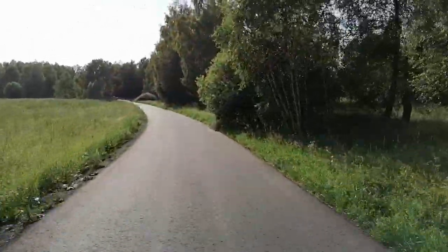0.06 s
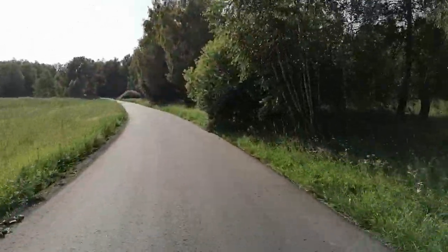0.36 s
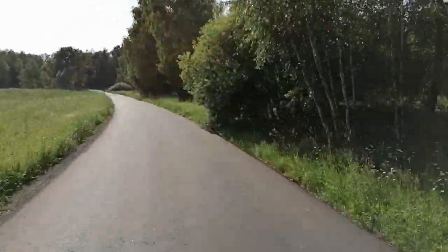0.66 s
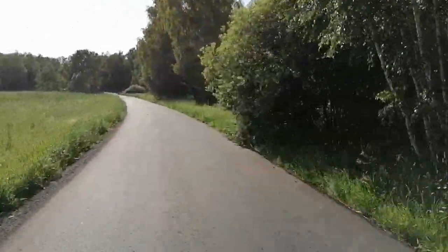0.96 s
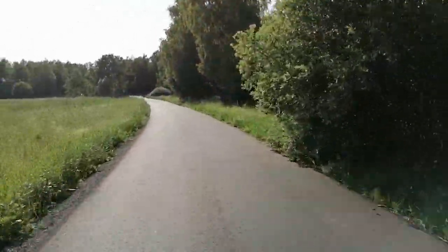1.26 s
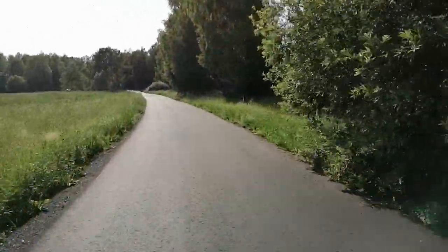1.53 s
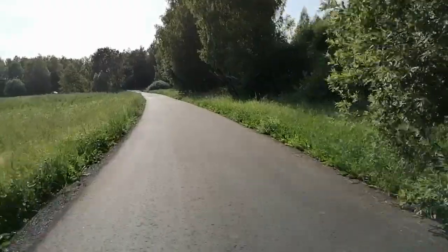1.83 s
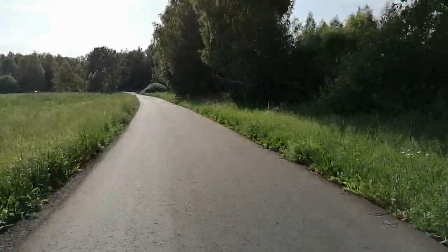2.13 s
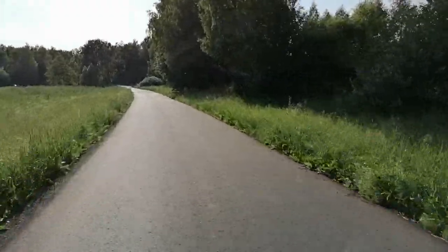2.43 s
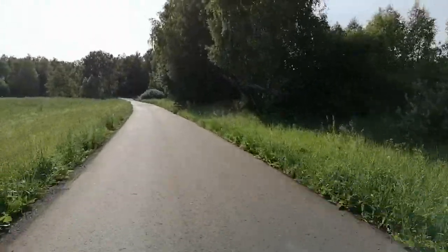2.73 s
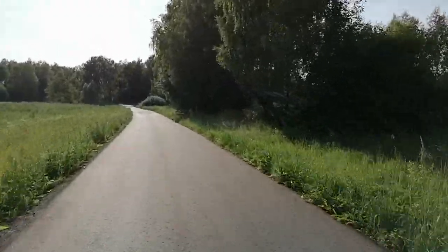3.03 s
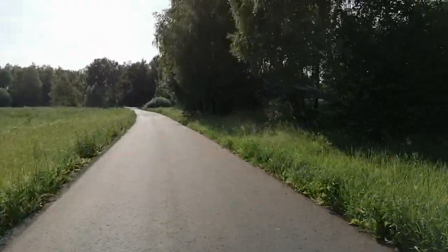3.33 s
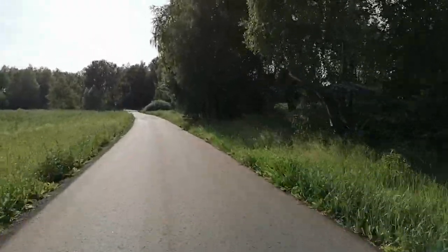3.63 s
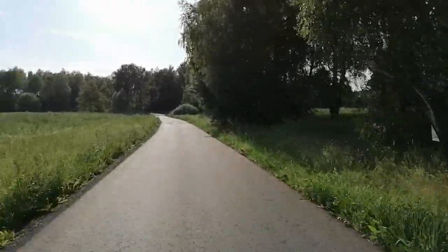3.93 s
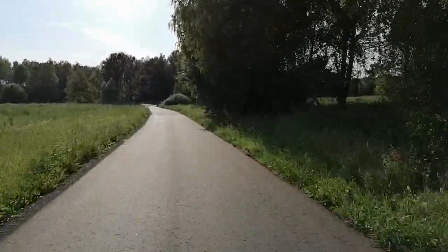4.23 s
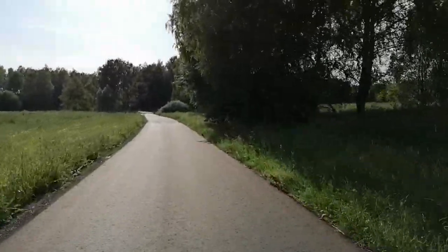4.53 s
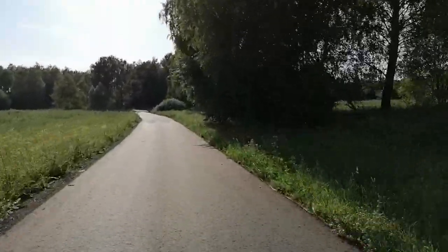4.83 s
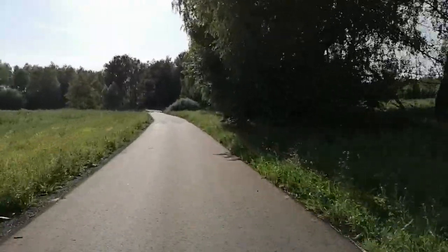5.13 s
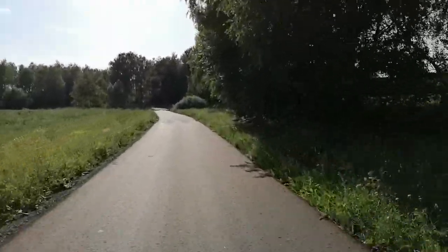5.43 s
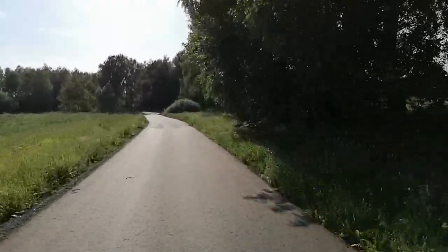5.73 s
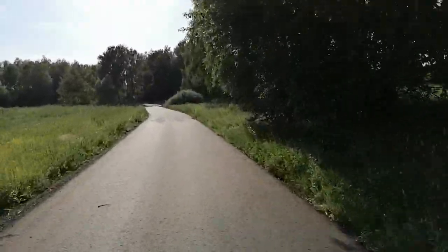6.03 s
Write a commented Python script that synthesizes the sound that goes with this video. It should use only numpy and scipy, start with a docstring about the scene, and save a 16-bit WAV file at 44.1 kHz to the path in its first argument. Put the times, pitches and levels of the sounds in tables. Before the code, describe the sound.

For about six seconds, a bicycle rolls at an even pace along an asphalt path, with the microphone travelling along. Low, fluttering wind buffets it throughout, much stronger on the left, swelling slightly with the pedalling and breaking into short thumps, the strongest at about 2.1 seconds. Beneath the wind, the tyres hold a steady, slightly rough, low-mid hum and a soft road rush. A thin hiss, a faint high buzz on the left and a light crackle of chippings continue alongside. Sharp little ticks of grit stand out at about 0.6, 2.1 and 3.7 seconds, with weaker ones scattered elsewhere. Fine sand sizzles faintly from 2.4 to 3.5 seconds and again near 4.4. Two faint, high bird chirps come from the left at about 3.1 and 3.4 seconds, and three more from the right between 5 and 5.4. Wind and tyres carry on to the end.

```python
"""An asphalt path between fields, ridden on a bicycle at an even pace.
Wind buffets the left microphone port and brushes the sheltered right one. The tyre tread hums and
the road roars under it; the left wind and the top of the hum swell with each pedal stroke.
Air hisses, chippings crackle and something small buzzes faintly. Grit ticks now and then,
patches of sand sizzle, and birds call from both sides."""
import sys
import numpy as np
from scipy import signal
from scipy.fft import rfft, irfft, next_fast_len
from scipy.io import wavfile

SR = 44100
rng = np.random.default_rng(int(sys.argv[2]) if len(sys.argv) > 2 else 0)


def to_wav(sig):
    """Store sig (one row per channel, or 1-D mono) as 16-bit WAV at the path in sys.argv[1].

    Samples outside -1..1 are clipped; the rate is SR.
    """
    pcm = np.clip(np.atleast_2d(sig), -1, 1) * 32767
    pcm = np.round(pcm).astype(np.int16)
    wavfile.write(sys.argv[1], SR, pcm.T)  # frames by channels


N = 276948
TIME = np.arange(N) / SR
SIZE = next_fast_len(N)
FREQS = np.maximum(np.fft.rfftfreq(SIZE, 1 / SR), 1)


def from_db(db):
    """Decibels to gain."""
    return 10 ** (np.asarray(db) / 20)


def unit_power(x):
    """Scale to an RMS of one."""
    return x / np.sqrt(np.mean(np.abs(x) ** 2) + 1e-20)


def in_time(rows):
    """Each column of an automation curve at every sample."""
    times, *columns = np.transpose(rows)
    return np.array([np.interp(TIME, times, c) for c in columns])


def over_hz(rows):
    """Each column of a spectrum at every frequency."""
    hz, *columns = np.transpose(rows)
    return np.array([np.interp(np.log(FREQS), np.log(hz), c) for c in columns])


def colour(x, gain):
    """Filter by a gain per frequency."""
    return irfft(rfft(x, SIZE) * gain, SIZE)[..., :N]


def white(channels):
    """Unrelated noises of 0 dB per Hz."""
    return rng.standard_normal((channels, N)) * np.sqrt(SR / 2)


def drift(rate_hz):
    """A smooth random wander with an RMS of one."""
    return unit_power(colour(rng.standard_normal(N), 1 / (1 + (FREQS / rate_hz) ** 2)))


def below(edge_hz):
    """The low side of a soft crossover, from 1 down to 0."""
    return 1 / (1 + (FREQS / edge_hz) ** 8)


def resonate(x, hz, width_hz):
    """Two like resonators in series, with unit gain at the peak."""
    r = np.exp(-np.pi * width_hz / SR)
    b = np.array([1, 0, -1]) * (1 - r * r) / 2
    a = [1, -2 * r * np.cos(2 * np.pi * hz / SR), r * r]
    return signal.lfilter(b, a, signal.lfilter(b, a, x + 1e-18) + 1e-18)


def pedal_stroke(peak_s, strokes_per_s=1.25):
    """The rise and fall of the pedalling, between -1 and 1."""
    return np.cos(2 * np.pi * strokes_per_s * (TIME - peak_s))


def eddies(tone, swell_db, steady_hz, flutter_db):
    """Turbulence of one size: levelled noise rides the swell, with a quick flutter on top."""
    noise = colour(white(channels=1)[0], tone)
    power = colour(noise ** 2, np.exp(-(FREQS / steady_hz) ** 2))
    levelled = noise / np.sqrt(np.maximum(power, 0) + 0.05 * noise.var())
    return noise.std() * unit_power(levelled * from_db(swell_db + flutter_db * drift(31.0)))


# Tone of the wind on each port: freq_hz, left_db, right_db
WIND_TONE = [(12.4, -53, -87), (30, -41.5, -65), (53, -44, -66), (96, -44.5, -61.5), (129.4, -48.5, -61.5),
             (207.6, -55, -65), (248, -57.5, -84), (370, -68, -82), (462, -73, -79), (684, -79.5, -86.5),
             (1490, -106, -110), (4000, -140, -140)]
# Gusts on the exposed port: time_s, large_eddies_db, small_eddies_db
GUST_SWELLS = [(0.0, -5, -1.5), (0.14, 0, -3), (0.23, -5, 3), (0.3, -7, -3.5), (0.42, 2.5, 3),
               (0.5, -1, -2), (0.7, -2.5, -7.5), (0.82, 1, 2.5), (0.92, 0, 1), (1.05, 1, -2),
               (1.35, 2, -1.5), (1.58, 0, 1), (1.7, -2, 2.5), (1.92, 2.5, 0.5), (2.04, -3.5, -0.5),
               (2.25, -5, -1), (2.4, -4, -3.5), (2.45, -6, -9), (2.52, -3.5, -6.5), (2.6, 1.5, -9.5),
               (2.77, 2.5, -4), (2.87, -6.5, -2.5), (2.99, 5.5, -9), (3.08, 1.5, -2), (3.2, -3, -0.5),
               (3.27, -4, -16), (3.42, 1.5, -4.5), (3.58, -1.5, -4), (3.92, 3, -3), (4.01, -12, 1.5),
               (4.1, 4, 2), (4.15, -6, -2.5), (4.24, -1, 0), (4.32, -4, -7.5), (4.38, -13, -6.5),
               (4.46, 0.5, -5), (4.6, -5.5, -0.5), (5.08, 0.5, -5), (5.22, -4, 1), (5.5, -2.5, -2),
               (5.9, 0, -5.5), (6.0, -3, 0), (6.06, -4.5, -7.5), (6.28, -1.5, 6)]
# Swells on the sheltered port, scaled by lee_depth: time_s, swell_db
LEE_SWELLS = [(0.0, 1), (0.5, 7.5), (0.7, 9), (0.8, 8), (2.2, 3), (2.3, -5), (2.95, -1), (3.2, -7),
              (3.4, 9), (3.55, -8), (4.05, 4.5), (6.28, -2)]
def wind(middle_share=0.64, lee_depth=0.69, stroke_db=1.0, puff_db=1.66):
    """Eddies of three sizes hit the left port, surging with the pedalling; the right is in the lee."""
    surge_db = stroke_db * pedal_stroke(peak_s=0.58) + puff_db * drift(18.7)
    large_db, small_db = in_time(GUST_SWELLS) + surge_db
    middle_db = large_db + middle_share * (small_db - large_db)
    left, right = from_db(over_hz(WIND_TONE))
    low, high = below(75.4), below(197.6)
    large = eddies(left * np.sqrt(low), large_db, steady_hz=10.0, flutter_db=2.5)
    middle = eddies(left * np.sqrt(np.abs(high - low)), middle_db, steady_hz=39.7, flutter_db=2.5)
    small = eddies(left * np.sqrt(1 - high), small_db, steady_hz=29.6, flutter_db=4.0)
    exposed = from_db(-1.0) * large + from_db(-1.7) * middle + from_db(-2.5) * small
    sheltered = eddies(right, lee_depth * in_time(LEE_SWELLS)[0], steady_hz=2.8, flutter_db=3.5)
    return np.array([exposed, sheltered])


# Riding speed, as tread blocks meeting the road: time_s, rate_hz
TREAD_RATE = [(0.0, 289.5), (1.35, 290), (1.75, 292), (2.8, 286.5), (3.5, 286.5), (3.9, 284), (4.7, 285),
              (5.3, 281.5), (6.3, 282)]
def rolling_tread(wobble_hz=2.2):
    """Phase of the tread in radians: one cycle per block, at a slightly unsteady rate."""
    rate_hz = in_time(TREAD_RATE)[0] + wobble_hz * drift(22)
    return 2 * np.pi * np.cumsum(rate_hz) / SR


# Partials of the hum: harmonic, left_db, right_db, roughness_share, waver_hz
HUM_PARTIALS = [(1, -44, -50.5, 0.21, 4.2), (2, -53, -60.5, 0.41, 35), (3, -60, -60.5, 0.7, 36),
                (4, -52, -59, 0.47, 52), (5, -54, -65.5, 0.49, 48), (6, -67.5, -62.5, 1, 14)]
# How hard the tread bites, riding the partials above the second: time_s, gain_db
TREAD_BITE = [(0.0, -3), (0.7, -3.5), (1.1, 1), (1.33, 1), (1.55, -2), (1.9, 2.5), (2.13, -3.5), (2.35, -2),
              (2.6, 2.5), (2.95, 2), (3.05, -3), (3.2, 0.5), (3.65, 0), (3.9, -2), (4.45, 0), (4.85, -1.5),
              (5.4, -3), (6.0, 0), (6.3, -2)]
def tread_hum(phase, stroke_db=0.5):
    """Blocks drum out a tone; the uneven road smears it, and its upper partials swell with each push."""
    bite_db = in_time(TREAD_BITE)[0] + stroke_db * pedal_stroke(peak_s=0.3)
    out = np.zeros((2, N))
    for harmonic, left_db, right_db, rough, waver_hz in HUM_PARTIALS:
        waver = np.sqrt(1 - rough) + np.sqrt(rough / 2) * (drift(waver_hz) + 1j * drift(waver_hz))
        partial = np.sqrt(2) * np.real(waver * np.exp(1j * harmonic * phase))
        swell = from_db(bite_db * (harmonic > 2))
        out += from_db([[left_db], [right_db]]) * swell * partial
    return out


# Tone of tyres on asphalt: freq_hz, left_db, right_db
ROAD_TONE = [(150, -76.5, -71), (440, -80.5, -79), (766, -83.5, -86.5), (980, -82.5, -86.5),
             (1310, -81.5, -82.5), (1600, -80.5, -84.5), (1920, -86, -80.5), (2320, -91.5, -92.5),
             (2904, -81, -86.5), (3204, -87, -90), (3880, -97, -106), (5230, -97.5, -106.5),
             (6000, -106, -109), (10600, -120, -125)]
# Narrow resonances in that tone: centre_hz, width_hz, gain_db
ROAD_RINGS = [(1720, 53, -2.5), (2340, 33, 8.5), (2430, 43, 2), (2616, 80, 3), (4070, 95, 3),
              (4870, 140, 1.5)]
# How alike the two ports hear the road: freq_hz, correlation
ROAD_LIKENESS = [(500, 0.068), (800, 0.32), (1200, 0.79), (2900, 0.94), (4000, 0.45), (5500, 0.97),
                 (7000, 0.15)]
# The road reaches the left port first: freq_hz, lead_rad
ROAD_LEAD = [(600, 1.6), (1400, 0.35), (1750, 0.5), (2300, 1), (3300, 2.6), (4600, 6.96), (6400, 9.3)]
# Band swells as the surface changes, before depth scaling: time_s, scrub_db, rasp_db, fizz_db
SURFACE_SWELLS = [(0.0, -2, 4, 0.5), (0.25, 2, -3, -0.5), (0.45, 0.5, 2.5, 1.5), (0.55, 4, -4, 0),
                  (0.6, -0.5, 0, 3.5), (0.65, 2.5, 0.5, -0.5), (1.05, 1.5, 6.5, 2.0), (1.15, -1, 1.5, 1.5),
                  (1.35, -0.5, -0.5, -0.5), (1.45, -1.5, 2.5, 3), (1.5, 0.5, -4, 0), (1.7, 0.5, 2.5, 2),
                  (1.75, -2, 1, 1), (2.05, 1.5, 7.5, 1), (2.15, 0.5, 1, 1.5), (2.4, 1, -0.5, 0.5),
                  (2.5, 1, 5.5, 1), (2.65, 0.5, -1.5, 2.5), (2.75, -2.5, 4.5, -0.5), (2.9, 1.5, -3, 3),
                  (3.0, -3.5, -1, -1.5), (3.35, 0, -4.5, 2), (3.5, -6.5, 1, 0), (3.6, -1, 0.5, -1),
                  (3.7, 0.5, -0.5, 2.0), (3.75, -2.5, 0.5, 0.5), (4.05, -4.5, -4, -1), (4.15, 2.0, -3, 2),
                  (4.2, -3, -3.5, 0), (4.35, 0, -1, 2), (4.65, -0.5, -2.5, 0.5), (4.9, 1.5, -2, 0.5),
                  (5.0, -2, -1, 2.5), (5.05, -0.5, -7, -1.5), (5.15, 1, -3.5, 2.5),
                  (5.45, -0.5, -4.5, -0.5), (5.55, -3, -5, 0), (5.65, 0.5, -3, 2.5), (5.8, 1.5, -1.0, 0.5),
                  (5.85, 1, -6, 2.5), (6.0, -1.5, -5, 0), (6.05, -1.5, -3.5, 2), (6.2, -3, -2, -1.5),
                  (6.27, -2, -2, 2)]
def road(phase, pumping_db=4.0, grain_db=1.0, roar_depth=0.97, fizz_depth=1.4):
    """Air is squeezed from the tread, one puff per block: low roar, scrub, rasp and a thin top fizz."""
    alike = np.clip(over_hz(ROAD_LIKENESS)[0], 0, 1)
    right_lag = np.exp(-1j * over_hz(ROAD_LEAD) * [[0], [1]])
    shared = colour(white(channels=1), np.sqrt(alike) * right_lag)
    noise = shared + colour(white(channels=2), np.sqrt(1 - alike))
    puffs_db = pumping_db * np.cos(phase) + grain_db * drift(41)
    rings_db = sum(db / (1 + (2 * (FREQS - hz) / width) ** 2) for hz, width, db in ROAD_RINGS)
    tone = from_db(over_hz(ROAD_TONE) + rings_db)
    scrub_db, rasp_db, fizz_db = in_time(SURFACE_SWELLS)
    low, middle, high = below(1500), below(2260), below(3100)
    bands = [(roar_depth * scrub_db, low), (scrub_db, middle - low),
             (rasp_db, high - middle), (fizz_depth * fizz_db, 1 - high)]
    return sum(colour(noise * unit_power(from_db(swell_db + puffs_db)), tone * band)
               for swell_db, band in bands)


# Airy top end, coloured by each port: freq_hz, left_db, right_db
HISS_TONE = [(3500, -115, -115), (6200, -108, -110.5), (7100, -104, -105), (7900, -106, -112),
             (8900, -97.5, -112.5), (9850, -97, -112.5), (10600, -106, -117), (12000, -108.3, -112.3),
             (13800, -110.8, -116), (14950, -104.5, -120), (15800, -111, -132)]
def air_hiss():
    """Fine, slightly grainy hiss of air, unrelated at the two ports."""
    grain_db = 1.2 * drift(200) + 0.4 * drift(3)
    return colour(white(channels=2) * unit_power(from_db(grain_db)), from_db(over_hz(HISS_TONE)))


# Fader ride on the buzz: time_s, gain_db
BUZZ_RIDE = [(0.0, -4), (1.2, -3), (2.5, 1.5), (3.4, 2), (4.2, -0.5), (6.28, -0.5)]
# Bright modes rung by its ticks: pitch_hz, width_hz, level_db
BUZZ_MODES = [(6830, 520, -71), (7400, 700, -78), (9400, 1500, -70.5)]
def buzz(phase, rate_hz=96.0, decay_s=0.0025, accents_db=(0, -1, -7, -2, -6), wheel_db=2.0):
    """Tiny ticks on the left, accented in fives and coming in flurries as the wheel turns."""
    flurry_db = 1.4 * drift(16)
    wheel = np.cos(phase / 60 - 2 * np.pi * 0.15)   # 60 tread blocks to a turn
    count = TIME * rate_hz
    accent_db = np.array(accents_db)[count.astype(int) % len(accents_db)]
    strength = from_db(in_time(BUZZ_RIDE)[0] + accent_db + flurry_db + wheel_db * wheel)
    ticks = rng.standard_normal(N) * np.exp(-(count % 1) / rate_hz / decay_s) * strength
    rings = sum(from_db(db) * unit_power(resonate(ticks, hz, width)) for hz, width, db in BUZZ_MODES)
    return rings * from_db([[0], [-16]])


def crackle(per_s, hz, width_hz, spread_db):
    """Grains of uneven size snap at random moments; unit power."""
    sizes = from_db(spread_db * np.minimum(rng.exponential(1, N), 3.5)) * rng.choice([-1, 1], N)
    snaps = rng.random(N) < per_s / SR
    return unit_power(resonate(snaps * sizes, hz, width_hz))


def chippings(left_db=-74.5, right_db=-82.5):
    """Coarse chippings snap faintly under the tyres all along the path."""
    return from_db([[left_db], [right_db]]) * crackle(per_s=45, hz=3930, width_hz=3200, spread_db=1.0)


# Single vortices slapping the exposed port: centre_s, level_db, pitch_hz, length_cycles
VORTEX_SLAPS = [(0.014, -20.5, 282, 0.79), (0.15, -21, 69, 1.1), (0.217, -18.5, 171, 1.4),
                (0.229, -26.5, 420, 2.2), (0.368, -24, 250, 1.6), (0.43, -33, 600, 4),
                (0.443, -27, 624, 2.8), (0.449, -18, 69, 1.04), (0.652, -14.5, 155, 1.6),
                (0.825, -15, 114, 1.1), (1.079, -20, 218, 1.1), (1.343, -24, 63, 1.6),
                (1.387, -15.5, 141, 0.96), (1.601, -20, 262, 1), (1.649, -25, 234, 1.2),
                (1.773, -18, 220, 1), (1.912, -14.5, 149, 1.4), (1.946, -28.5, 277, 3.8),
                (2.082, -8.5, 105, 1.36), (2.147, -27.5, 376, 1.7), (2.205, -13.5, 125, 2.3),
                (2.28, -14.5, 61.6, 0.92), (2.299, -19.5, 400, 1.03), (2.397, -14, 69.6, 0.74),
                (2.76, -17.5, 49.7, 1.45), (3.049, -17, 190, .7), (3.085, -16.5, 127, 1.2),
                (3.19, -16, 140, 0.72), (3.434, -14, 101, 1.23), (3.747, -11.5, 104, 1.3),
                (3.917, -16.5, 109, 1.3), (3.935, -13, 202, 0.88), (4.005, -23, 327, 1.2),
                (4.026, -23.5, 288, 1.5), (4.082, -20.5, 268, 1.06), (4.111, -19.5, 148, 1.6),
                (4.583, -16, 127, 1.1), (4.668, -21, 187, 1.8), (4.716, -15, 136, 1.2),
                (4.806, -20.5, 200, 1.6), (5.198, -19.5, 200, 1.2), (5.215, -16.5, 208, 1.2),
                (5.285, -21.5, 340, 1.3), (5.3, -14.5, 110, 1.5), (5.39, -16.5, 70, 1),
                (5.417, -13, 156, 1.04), (5.99, -15, 59, 0.98), (6.009, -22.5, 230, 1.3),
                (6.141, -16.5, 222, 1.4)]
def buffets(port_hz=800):
    """A passing vortex swings the pressure for a cycle or a few; the port rounds off the sharpest."""
    out = np.zeros(N)
    for centre_s, db, hz, cycles in VORTEX_SLAPS:
        turns = (TIME - centre_s) * hz
        near = np.abs(turns) < 4 * cycles
        spread = (np.pi * cycles) ** 2
        swing = (1 - 2j * np.pi * turns[near] / spread) ** -(spread + 1)   # a bell-shaped wave packet
        out[near] += from_db(db) * np.real(swing * np.exp(2j * np.pi * rng.random()))
    return colour(out, np.sqrt(below(port_hz))) * from_db([[-1], [-26]])


# Sharp ticks of grit: start_s, level_db, pitch_hz, decay_s
GRIT_TICKS = [(0.593, -38, 2130, 0.0033), (.829, -61, 3600, .004), (2.065, -41, 2700, .004),
              (2.812, -55, 10200, .005), (2.88, -50, 11500, .003), (2.953, -53, 11500, .005),
              (3.102, -60, 12000, .004), (3.226, -49, 3900, .003), (3.678, -42, 2190, 0.0043),
              (3.681, -45, 3700, .003), (3.819, -58, 3900, .004), (4.521, -52, 11500, .002),
              (6.197, -51, 3920, .004)]
def grit(width_share=0.55):
    """Each grain cracks briefly under the tyre, louder on the left."""
    out, age = np.zeros((2, N)), TIME[:SR // 20]
    for start_s, db, hz, decay_s in GRIT_TICKS:
        burst = rng.standard_normal((2, len(age))) * np.exp(-age / decay_s)
        crack = resonate(burst, hz, width_share * hz)
        at = round(start_s * SR)
        out[:, at:at + len(age)] += (from_db(db) * crack / np.abs(crack).max())[:, :N - at]
    return out * from_db([[3], [-5]])


# Patches of fine sand: centre_s, half_length_s, level_db
SAND_PATCHES = [(2.85, .48, -80), (3.33, .12, -81), (4.42, .16, -77)]
def sand():
    """Tiny grains sizzle while the tyres cross each patch."""
    patches = sum(from_db(db) * np.exp(-((TIME - centre_s) / half_s) ** 4)
                  for centre_s, half_s, db in SAND_PATCHES)
    grains = np.array([crackle(per_s=170, hz=10400, width_hz=7400, spread_db=1.5) for port in range(2)])
    return patches * grains * from_db([[0], [-6]])


# Bird chirps: start_s, length_s, start_hz, middle_hz, end_hz, level_db, left_minus_right_db
BIRD_NOTES = [(3.06, .06, 5150, 5350, 5300, -68, 8), (3.4, .042, 5400, 5200, 5050, -61.5, 10),
              (4.995, .042, 6000, 5300, 4650, -65.5, -10), (5.17, .05, 6100, 7000, 6600, -74, -18),
              (5.298, .088, 4950, 6250, 5000, -70, -18)]
def birds(flutter_db=3):
    """Thin whistles that fall or arch, fluttering on their way from either side of the path."""
    out = np.zeros((2, N))
    for start_s, length_s, start_hz, middle_hz, end_hz, db, pan_db in BIRD_NOTES:
        along = np.clip((TIME - start_s) / length_s, 0, 1)
        hz = np.polyval(np.polyfit([0, 0.5, 1], [start_hz, middle_hz, end_hz], 2), along)
        envelope = np.sqrt(np.abs(np.sin(np.pi * along)))
        sides = from_db(db + np.minimum([[pan_db], [-pan_db]], 0))
        out += sides * envelope * np.sin(2 * np.pi * np.cumsum(hz) / SR)
    return out * unit_power(from_db(flutter_db * drift(90)))


def scene():
    """One rolling tread drives the hum, the road noise and the swell of the buzz; wind lies on top."""
    phase = rolling_tread()
    return (wind() + buffets() + tread_hum(phase) + road(phase) + air_hiss() + buzz(phase)
            + grit() + chippings() + sand() + birds())


def record(dry, low_cut_hz=8, high_cut_hz=15750):
    """The lowest rumble is blocked and the top is cut steeply."""
    dry = signal.sosfilt(signal.butter(1, low_cut_hz, "high", fs=SR, output="sos"), dry)
    return colour(dry, 1 / np.sqrt(1 + (FREQS / high_cut_hz) ** 240))


dry = scene()
out = record(dry)
to_wav(out)
```